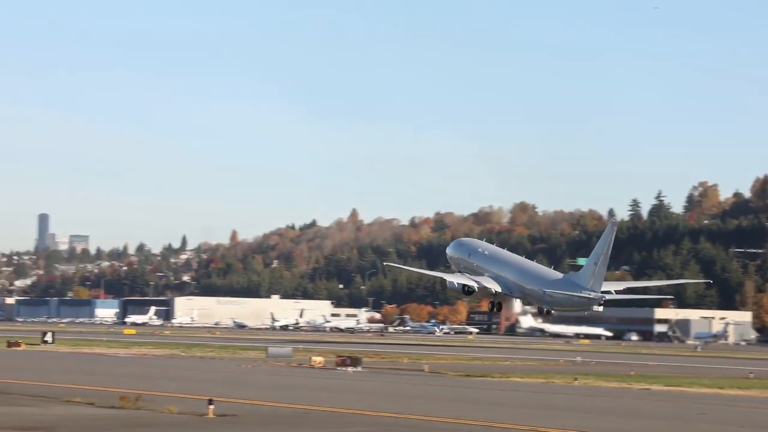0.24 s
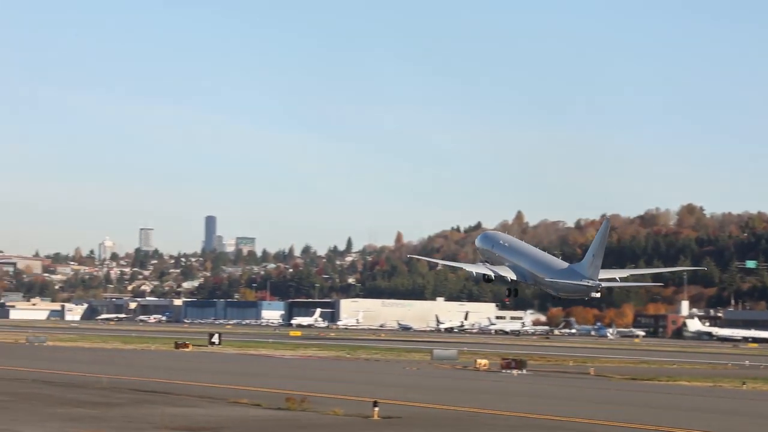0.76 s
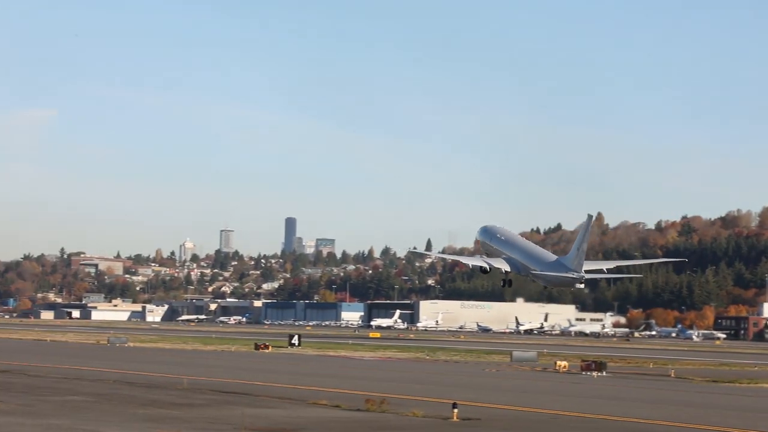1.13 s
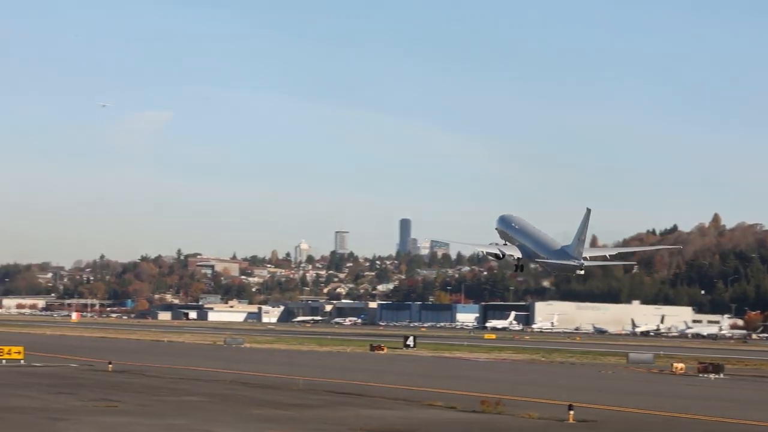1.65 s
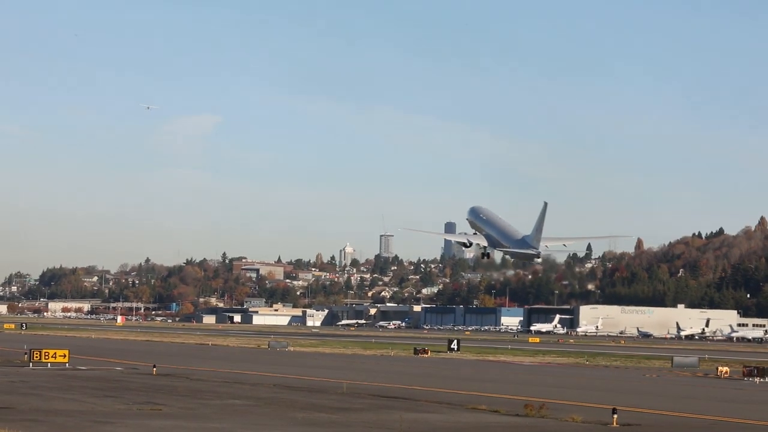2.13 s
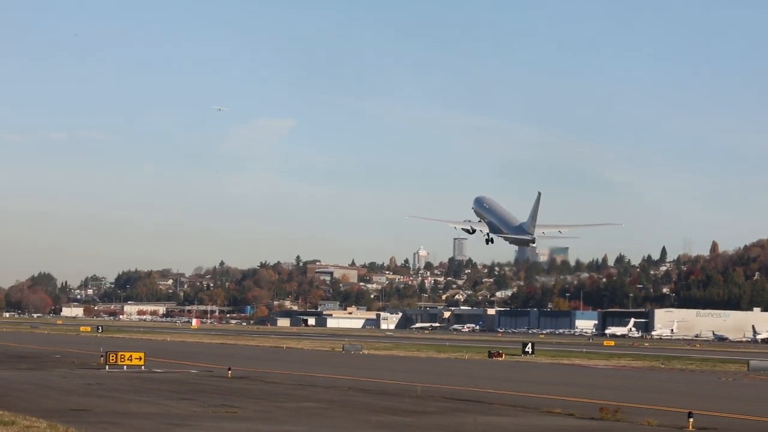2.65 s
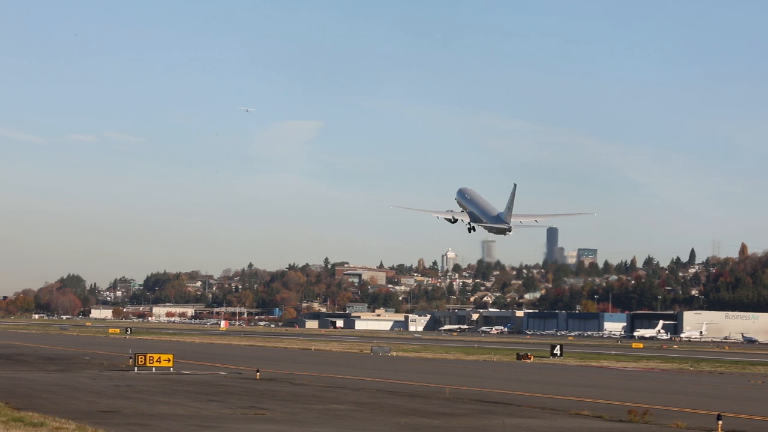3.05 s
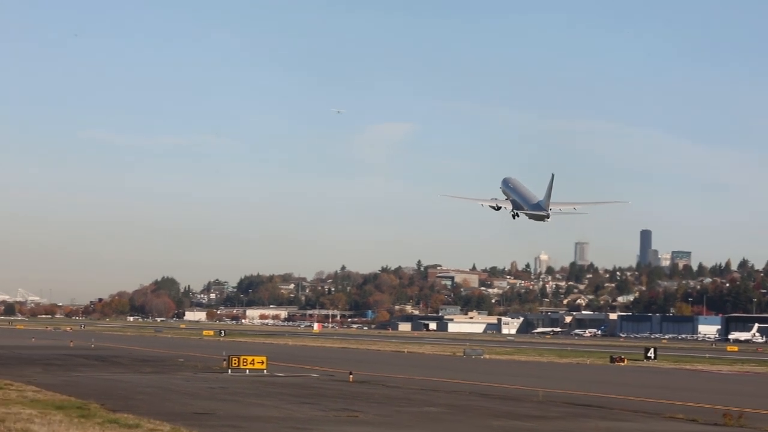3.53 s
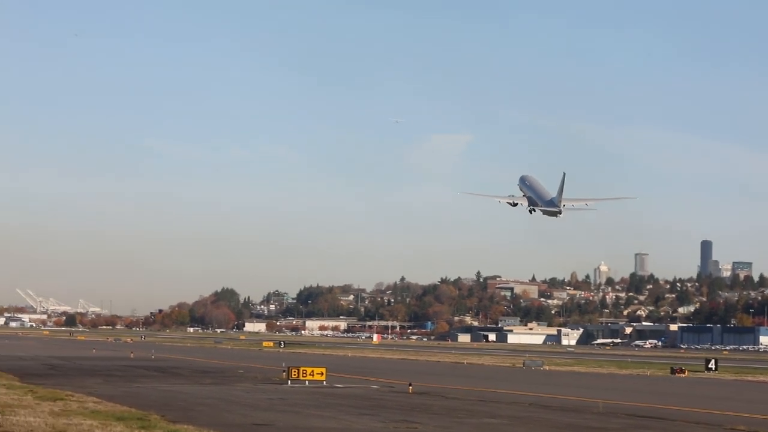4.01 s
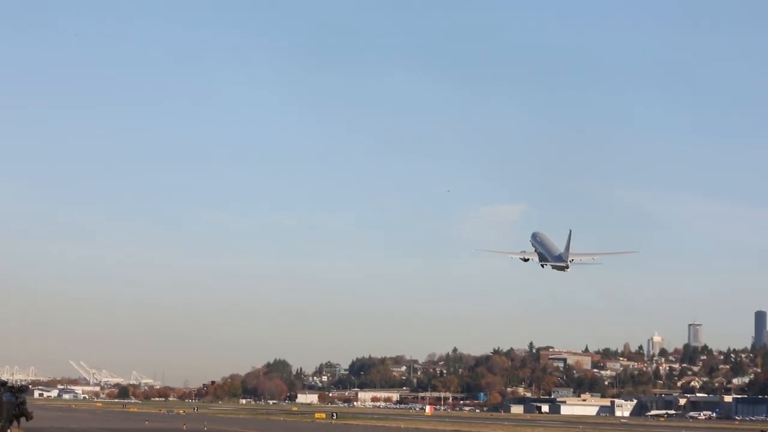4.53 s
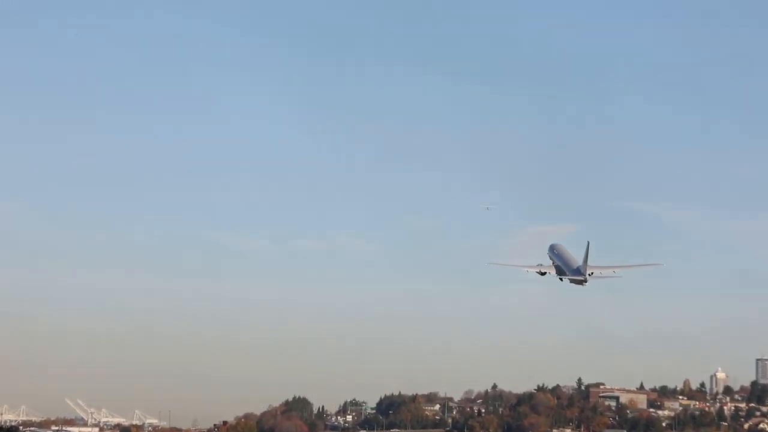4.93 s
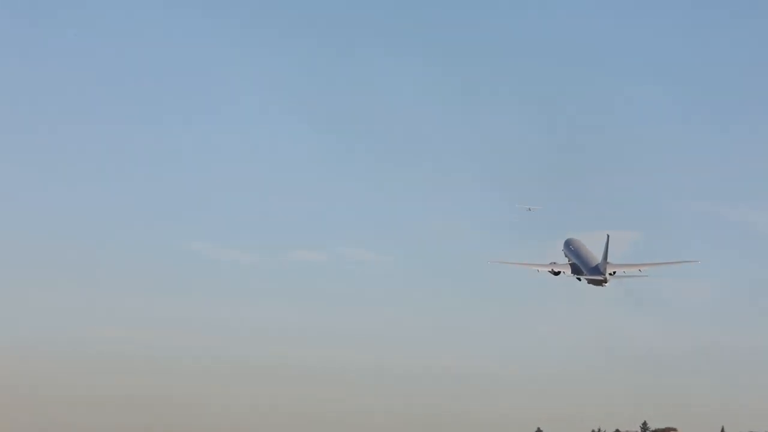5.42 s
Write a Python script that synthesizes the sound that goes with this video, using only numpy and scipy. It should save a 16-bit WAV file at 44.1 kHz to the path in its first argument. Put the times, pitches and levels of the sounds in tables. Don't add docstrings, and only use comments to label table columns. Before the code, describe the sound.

The sound begins at once, with a twin-engine jet at take-off power heard from open grass beside a runway. A heavy, continuous exhaust rumble leads, swelling in short irregular lumps, notably around 0.85 and 1.1 seconds. Above it sit a broad mid roar and a breathy fan hiss without a clear whine. As the jet flies away, the roar shrinks gradually, its tone wandering slightly from ground reflections and moving air. From about 3 to 4.6 seconds the hiss dulls markedly, leaving darker rumble. Very faint finger ticks and rubbing lie close to the microphone, mainly around 3.0 to 3.4 seconds; at 3.23 a brief, dry plastic snap stands out clearly. Near 4.8 and 5.2 seconds the deepest rumble dips, then swells again around 5.4. A tiny lid tap at 5.47 is nearly masked. The low roar is still present when everything cuts off at about 5.7 seconds.

```python
import sys
import numpy as np
from scipy import signal
from scipy.fft import rfft, irfft, next_fast_len
from scipy.io import wavfile
from scipy.ndimage import uniform_filter1d, map_coordinates

SR = 44100
rng = np.random.default_rng(int(sys.argv[2]) if len(sys.argv) > 2 else 0)


def natural_amplitude(level_db):
    exponent = np.asarray(level_db, float) / 20
    return 10 ** exponent


def pcm_store(signal):
    levels = np.round(np.clip(np.atleast_2d(signal), -1, 1) * 32767)
    wavfile.write(sys.argv[1], SR, levels.astype(np.int16).T)


N = 250047

# (time [s], first dip [Hz], echo strength [0-1])
GROUND_ECHO = [
    (0, 410, .45),
    (.6, 439, 0.66),
    (1.5, 346, 0.07),
    (2.7, 423, 0.04),
    (3.3, 592, 0.24),
    (4, 546, 0.44),
    (5, 495, .6),
    (5.3, 405, 0.96),
    (5.67, 426, 0.73),
]
# (frequency [Hz], level [dB])
DEEP_SPECTRUM = [(30, -41), (42, 4.5), (52, 0), (62, 12), (80, 2), (100, -10), (130, -39.5)]
RUMBLE_SPECTRUM = [(55, -43), (75, -7.5), (90, 2), (125, -3.5), (150, -4), (200, -44)]
BODY_SPECTRUM = [(100, -38), (140, -7.5), (170, -0.5), (230, -5), (320, -9.5), (420, -24.5), (600, -45.5)]
ROAR_SPECTRUM = [(250, -38.5), (350, 3), (450, 3.5), (650, -2), (850, -4.5), (1050, -8), (1400, -36.5)]
CORE_SPECTRUM = [(750, -39.5), (1000, -4.5), (1200, -0.5), (1350, -3), (1600, -7.5), (1900, -9),
                 (2500, -45)]
# (frequency [Hz], level [dB])
FAN_LOW_SPECTRUM = [(1200, -42), (1600, -13), (2000, 1.5), (2400, -3), (2700, -9.5), (3300, -39.5)]
FAN_HIGH_SPECTRUM = [(2000, -38.5), (2500, -0.5), (2800, 1.5), (3150, 0.5), (3700, -12.5), (4500, -21.5),
                     (5500, -32.5), (7000, -46.5), (9000, -57)]
# (frequency [Hz], level [dB])
FIELD_SPECTRUM = [(8, -39), (20, -12), (30, -2), (40, 9.5), (50, 5.5), (70, -47)]
FAR_HISS_SPECTRUM = [(2300, -32), (2800, -6.5), (3300, -4.5), (3700, -3), (3950, -14), (4500, -24),
                     (5500, -35)]
SKIN_SPECTRUM = [(3500, -27.5), (4500, -1), (6000, 1), (7500, -3), (9000, -5), (11000, -29.5)]
PREAMP_SPECTRUM = [(1500, -4), (5000, 1), (8000, -4), (11950, -2.5)]
# (frequency [Hz], level [dB], time to fall by 60 dB [s])
SHELL_MODES = [(2310, -3.5, 0.012), (2790, -8, 0.015), (3120, -4, 0.0093), (3600, -13, 0.016),
               (4250, -4.5, 0.0069), (6100, -15.5, 0.0048), (7370, -50, 0.075), (7440, -21, 0.0053),
               (9100, -26, 0.0056), (9800, -28, .006), (11300, -34, .006), (14300, -38, .006)]
LID_MODES = [(4400, -1, .006), (6000, 3, 0.0076), (7800, -6, .005), (9800, 0, .008), (11000, -12, .005)]
# (time [s], peak level [dB])
SNAP_HIT = (3.2322, -18.5)
TAP_HIT = (5.4749, -60.5)
# (time [s], peak level [dB], centre [Hz])
FINGER_TICKS = [(.265, -75, 9800), (.348, -77, 9600), (.4875, -82, 9500), (.583, -83, 10000),
                (.608, -81, 8500), (.648, -81, 9800), (1.942, -81, 7800), (1.960, -78, 8600),
                (2.0465, -76, 8500), (3.000, -76, 5500), (3.05, -81.5, 7000), (3.067, -81.5, 8000),
                (3.09, -82, 6000), (3.152, -78, 7500), (3.186, -82, 6000), (3.217, -80, 7000),
                (3.3, -80, 7500), (3.318, -82, 8500), (3.342, -80, 7200), (3.353, -83, 7000),
                (3.385, -80, 7000), (3.399, -77, 7500)]
# (time [s], centre [Hz],
# width [Hz], gain [dB], half length [s])
BAND_SWELLS = [(.1, 596, 200, 1.5, 0.2), (0.247, 1224, 161.5, 4.5, 0.39), (1.145, 830, 142.6, 3.5, .3),
               (1.95, 950, 300, -1, 0.4), (2.505, 1223, 140, 4.5, 0.29), (3.103, 1340, 300, 4.5, 0.33),
               (3.248, 176.3, 40.2, -5, 0.49), (4.747, 783, 139, 4, 0.77), (5.0, 150.8, 39.4, 4, .2),
               (.8, 400, 80, -1, .3), (5.45, 260, 60, 3, 0.18), (5.406, 1405, 503, 5.5, .35)]
# (time [s], shadow [dB])
WARM_AIR = [(0, 0), (.4, 1.5), (.8, 4), (1.22, 2), (1.56, 5), (1.85, 4.5), (2.7, 5.5), (3.2, 7), (3.5, 10),
            (3.95, 13.5), (4.6, 17), (5.0, 15.5), (5.3, 14.5), (5.67, 14)]
# (time [s], pitch [Hz], swell [dB], half length [s])
BIG_EDDIES = [(0.066, 60, 4.5, 0.022), (.27, 60, -8, 0.037), (0.338, 60, 0.5, 0.024),
              (0.746, 60, 4.5, 0.039), (0.853, 82, 13, 0.032), (1.0, 110, -2.5, .03),
              (1.084, 140, 9, 0.032), (1.22, 60, 7.5, 0.03), (1.458, 145, 6, 0.044), (1.72, 60, 6, 0.028),
              (1.821, 105, 5, 0.02), (1.893, 60, 1.5, 0.043), (1.949, 105, 4, 0.064), (2.276, 105, -1, .04),
              (2.43, 80, 7.5, 0.019), (2.614, 85, 8, 0.041), (2.85, 95.8, 3, .08), (3.258, 80, 6, 0.066),
              (3.557, 60, 6.5, 0.064), (3.656, 105, 3.5, .06), (3.84, 60, 5, 0.032), (4.207, 60, 2, .05),
              (4.44, 60, 5.5, 0.023), (4.575, 65, 5, 0.03), (4.803, 55, -9, 0.1), (4.82, 110, 5, 0.077),
              (4.98, 200, 3, 0.05), (5.23, 58, -11, .04), (5.36, 82, 8, 0.086), (5.62, 55, 4.5, .05)]

START_M, SPEED_M_S = 284, 89.2
# (level at the start [dB], share of the spreading loss, share of the warm-air shadow)
DEEP_LAW, RUMBLE_LAW, BODY_LAW = (-30.5, 0.61, 0.0089), (-24, 1.28, 0.014), (-31, .8, 0.023)
ROAR_LAW, CORE_LAW = (-35.5, 0.89, 0.15), (-45, 0.43, 0.29)
FAN_LOW_LAW, FAN_HIGH_LAW = (-47, 0.24, 1.19), (-51.5, .4, 1.13)


def unit(x):
    return x / np.sqrt(np.mean(x ** 2) + 1e-20)


def along(points, hz):
    f, db = np.transpose(points)
    return np.interp(np.log(hz + 1), np.log(f + 1), db, left=-150, right=-150)


def curves(rows, t=None):
    times, *columns = np.transpose(rows)
    if t is None:
        t = np.arange(N) / SR
    return [np.interp(t, times, column) for column in columns]


def noise(spectrum, even_s=0., evenness=0.):
    size = next_fast_len(N + 8192)
    colour = natural_amplitude(along(spectrum, np.fft.rfftfreq(size, 1 / SR)))
    x = irfft(rfft(rng.standard_normal(size)) * colour, size)[:N]
    if even_s:
        power = np.abs(uniform_filter1d(x ** 2, int(even_s * SR)))
        width = int(even_s * SR)
        smooth = np.abs(uniform_filter1d(uniform_filter1d(x ** 2, width), width))
        x = x / (smooth + 1e-20) ** (evenness / 2)
    return unit(x)


def through(x, gain):
    hz, s, z = signal.stft(x, SR, nperseg=2048, noverlap=1536, boundary="even")
    return signal.istft(z * gain(hz[:, None], s), SR, nperseg=2048, noverlap=1536)[1][:N]


def band(x, lo_hz, hi_hz):
    return signal.sosfilt(signal.butter(4, [lo_hz, hi_hz], "bandpass", fs=SR, output="sos"), x)


def airfield():
    drone = natural_amplitude(-44.5) * noise(FIELD_SPECTRUM, even_s=.06, evenness=0.52)
    return drone + natural_amplitude(-80.0) * noise(FAR_HISS_SPECTRUM)


def grip():
    out = np.zeros(N + SR)
    t = np.arange(SR // 40) / SR
    for s, db, hz in FINGER_TICKS:
        spit = natural_amplitude(db + 4.5 - 60 * t / .025) * rng.standard_normal(len(t))
        out[round(s * SR):][:len(t)] += band(spit, .75 * hz, min(1.22 * hz, 11500))
    rub_start_s, rub_end_s, rub_edge_s, rub_db = 3.03, 3.42, .045, -94
    grain_db = 4 * map_coordinates(rng.standard_normal(N // 200 + 4), [np.arange(N) / 200])
    now = np.arange(N) / SR
    inside_s = np.minimum(now - rub_start_s, rub_end_s - now)
    touch = np.clip(1 + inside_s / rub_edge_s, 0, 1) ** 2
    return out[:N] + natural_amplitude(rub_db) * touch * unit(natural_amplitude(grain_db) * noise(SKIN_SPECTRUM))


def struck(hit, modes, crack_db, top_hz, rise_s):
    s, db = hit
    t = np.arange(SR // 8) / SR
    ring = np.zeros(len(t))
    for k, (hz, level_db, t60_s) in enumerate(modes):
        sense = -1 if k == 1 else 1
        ring += sense * natural_amplitude(level_db - 60 * t / t60_s) * np.sin(2 * np.pi * hz * t)
    crack = natural_amplitude(crack_db - 60 * t / 0.0081) * rng.standard_normal(len(t))
    rise = 1 - np.exp(-t / rise_s)
    out = np.zeros(N + SR)
    out[round(s * SR):][:len(t)] = natural_amplitude(db) * (ring * rise + band(crack * rise, 4000, top_hz))
    return out[:N]


def clicks():
    snap = struck(SNAP_HIT, SHELL_MODES, crack_db=-27.5, top_hz=16000, rise_s=0.00049)
    return snap + struck(TAP_HIT, LID_MODES, crack_db=4.5, top_hz=10000, rise_s=0.00046)


def distance(s):
    return START_M + SPEED_M_S * s


def spreading_db(s):
    return 20 * np.log10(distance(s) / START_M)


def heard(law):
    start_db, spread, shade = law
    return start_db - spread * spreading_db(np.arange(N) / SR) - shade * curves(WARM_AIR)[0]


def eddies(layer_hz):
    t = np.arange(0, N, 50) / SR
    swell_db = np.zeros(len(t))
    for s, hz, db, half_s in BIG_EDDIES:
        octaves = np.log2(hz / layer_hz)
        swell_db += db * np.exp(-(octaves / .55) ** 2 - ((t - s) / half_s) ** 2)
    return np.interp(np.arange(N) / SR, t, swell_db)


def ground(x):
    def comb(hz, s):
        dip_hz, echo = curves(GROUND_ECHO, s)
        echo = np.clip(echo, 0, .9) * np.exp(-(hz / 900) ** 2)
        return np.sqrt(1 + 2 * echo * np.cos(np.pi * hz / dip_hz) / (1 + echo ** 2))
    return through(x, comb)


def focused(x):
    def lenses(hz, s):
        gain_db = 0
        for at_s, centre_hz, width_hz, db, half_s in BAND_SWELLS:
            gain_db = gain_db + db * np.exp(-((s - at_s) / half_s) ** 2 - ((hz - centre_hz) / width_hz) ** 2)
        return natural_amplitude(gain_db)
    return through(x, lenses)


def turbulence(x, patchy_db):
    def patches(hz, s):
        field = rng.standard_normal((len(hz), len(s)))
        field = uniform_filter1d(uniform_filter1d(field, size=12, axis=0), size=14, axis=1)
        return natural_amplitude(patchy_db * unit(field))
    return through(x, patches)


def fans():
    def air(hz, s):
        loss_db = -6 + 33.5 * (distance(s) - START_M) / 1000
        return natural_amplitude(-loss_db * np.clip((hz - 3100) / 2900, 0, 2) ** 0.5)
    low = natural_amplitude(heard(FAN_LOW_LAW)) * noise(FAN_LOW_SPECTRUM)
    return low + natural_amplitude(heard(FAN_HIGH_LAW)) * through(noise(FAN_HIGH_SPECTRUM), air)


def mixing():
    def tilt(hz, s):
        dip_hz, echo = curves(GROUND_ECHO, s)
        lean_db = -4.5 + 7.9 * np.log2(dip_hz / 420) + 0.88 * spreading_db(s)
        octaves = np.log2(np.clip(hz, 120, 500) / 220)
        return natural_amplitude(4 * echo + (lean_db - 4 * echo) * octaves)
    body = through(noise(BODY_SPECTRUM, even_s=0.15, evenness=1.0), tilt)
    body = natural_amplitude(heard(BODY_LAW) + eddies(layer_hz=200)) * body
    roar = natural_amplitude(heard(ROAR_LAW)) * noise(ROAR_SPECTRUM, even_s=0.24, evenness=0.46)
    core = natural_amplitude(heard(CORE_LAW)) * noise(CORE_SPECTRUM, even_s=0.27, evenness=0.26)
    return focused(body + ground(roar + core))


def plume():
    deep = noise(DEEP_SPECTRUM, even_s=0.076, evenness=0.55)
    rumble = noise(RUMBLE_SPECTRUM, even_s=0.063, evenness=0.52)
    deep = natural_amplitude(heard(DEEP_LAW) + eddies(layer_hz=60)) * deep
    return deep + natural_amplitude(heard(RUMBLE_LAW) + eddies(layer_hz=105)) * rumble


def scene():
    jet = turbulence(fans(), patchy_db=1.07) + mixing() + plume()
    return (airfield() + grip() + clicks() + jet)[None]


def top_cut(x):
    return signal.sosfilt(signal.butter(12, 16000, fs=SR, output="sos"), x)


def record(dry):
    n = np.arange(N)
    edges = np.clip(np.minimum(n, N + 25 - n) / (.001 * SR), 0, 1)
    mix = edges * dry + natural_amplitude(-91.5) * noise(PREAMP_SPECTRUM)
    return top_cut(mix)


dry = scene()
out = record(dry)
pcm_store(out)
```